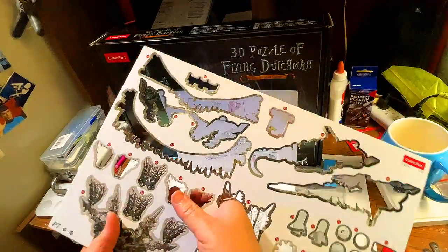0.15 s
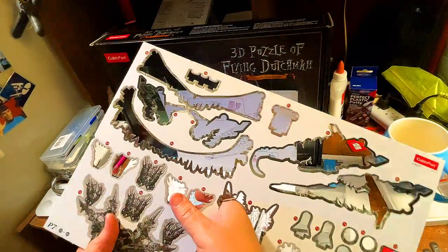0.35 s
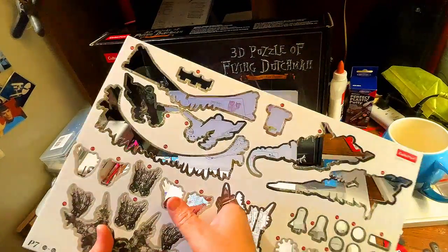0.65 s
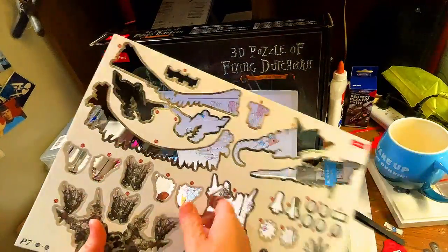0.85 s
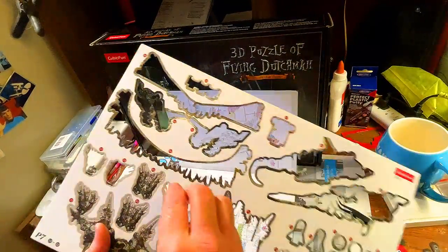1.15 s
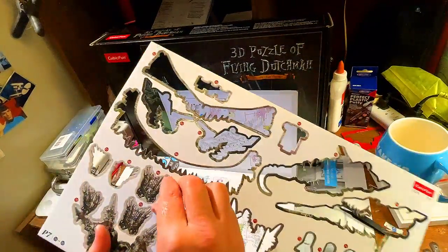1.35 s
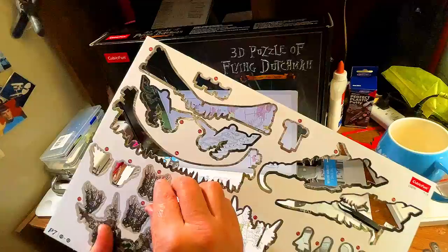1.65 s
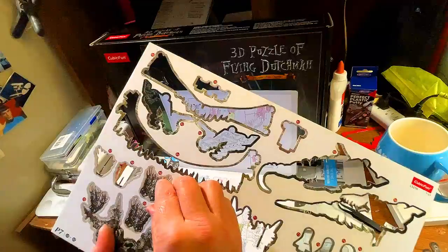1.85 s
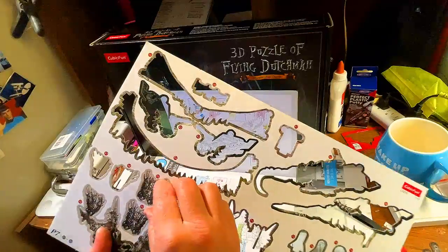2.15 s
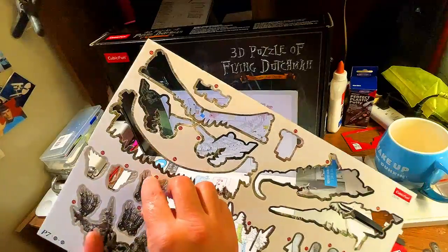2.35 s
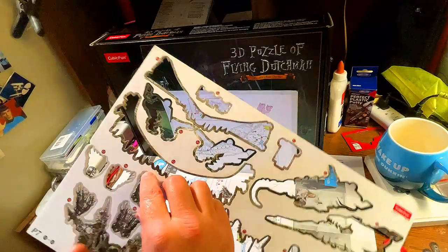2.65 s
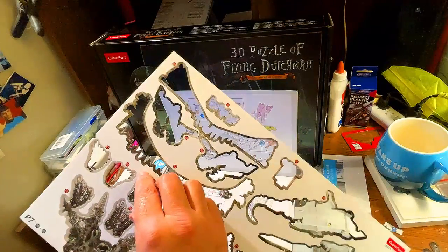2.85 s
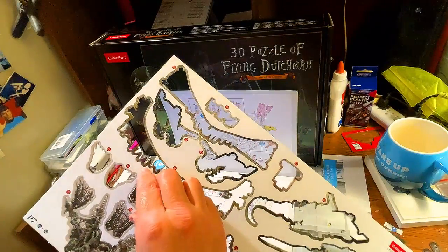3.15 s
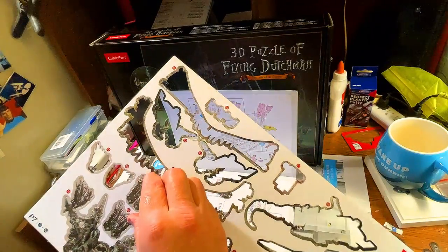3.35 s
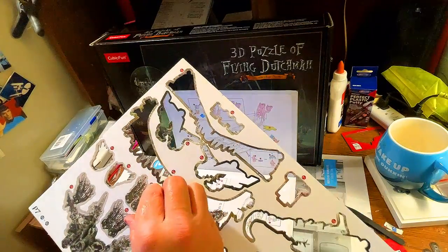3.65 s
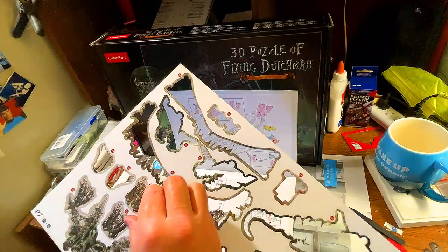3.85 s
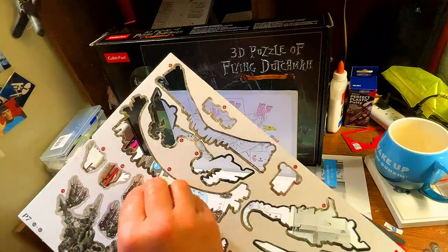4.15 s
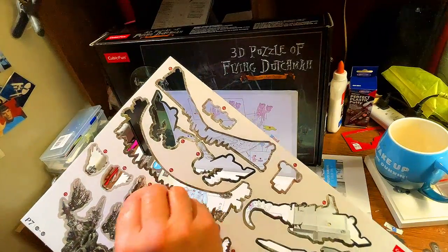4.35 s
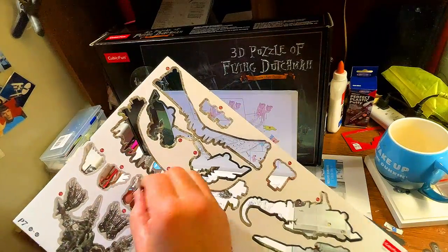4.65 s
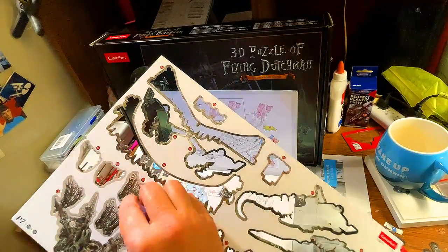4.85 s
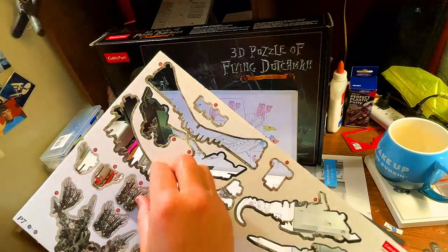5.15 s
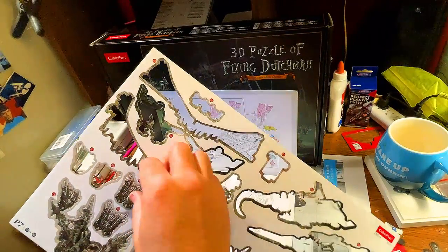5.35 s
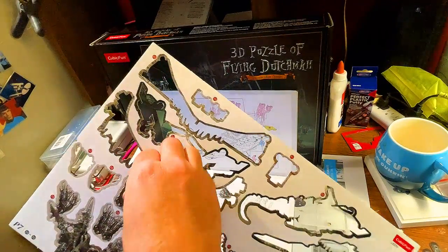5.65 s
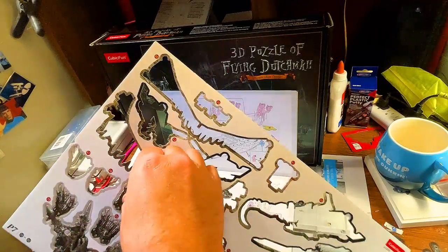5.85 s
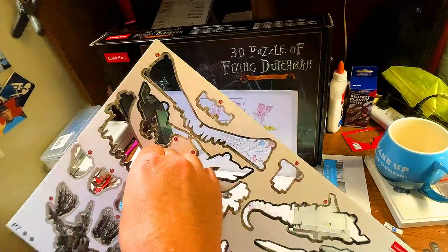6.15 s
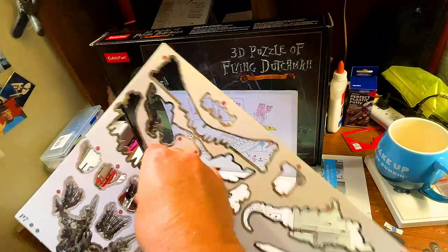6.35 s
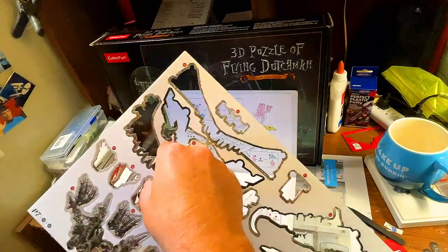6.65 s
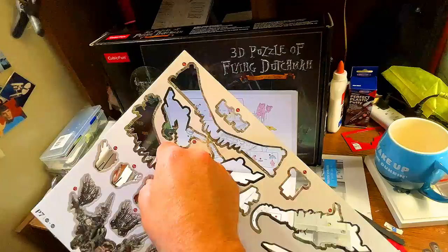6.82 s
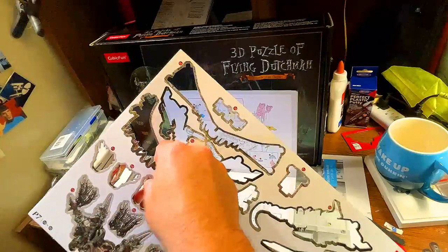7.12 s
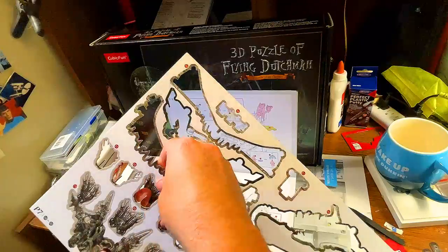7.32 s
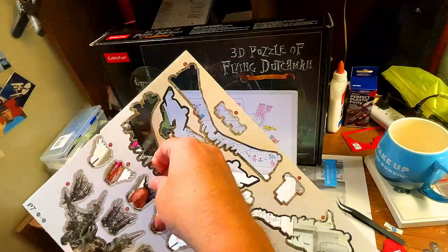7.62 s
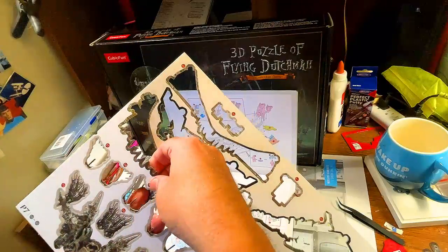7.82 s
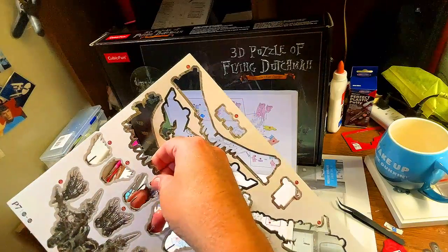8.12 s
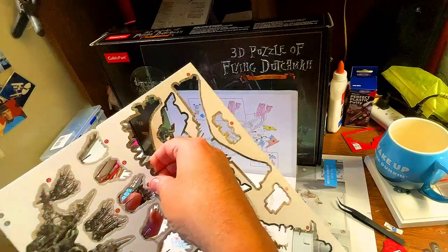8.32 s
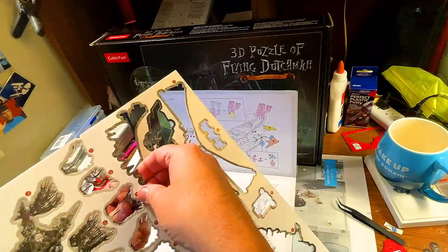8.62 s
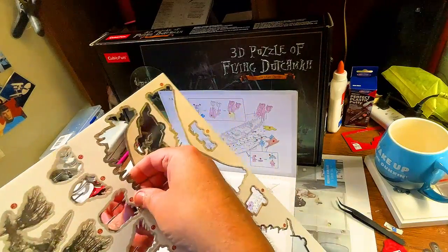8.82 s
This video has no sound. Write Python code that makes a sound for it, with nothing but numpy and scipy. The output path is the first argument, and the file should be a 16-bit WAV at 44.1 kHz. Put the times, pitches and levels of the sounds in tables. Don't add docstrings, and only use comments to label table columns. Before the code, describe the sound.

Close to a small microphone at a desk, fingers rub stiff cardboard and pop pieces from it. A few light snaps come first, then a quieter rub, then a loud cluster of cracks at two seconds. More bursts follow at uneven gaps, with soft knocks, a quiet stretch, and a final rough tear. A low appliance hum continues throughout in the small, dry room.

```python
import sys
import numpy as np
from scipy import signal
from scipy.fft import rfft, irfft
from scipy.io import wavfile
from scipy.ndimage import uniform_filter1d, minimum_filter1d

SR = 44100
rng = np.random.default_rng(int(sys.argv[2]) if len(sys.argv) > 2 else 0)


def to_wav(sig):
    pcm = np.clip(np.atleast_2d(sig), -1, 1) * 32767
    pcm = np.round(pcm).astype(np.int16)
    wavfile.write(sys.argv[1], SR, pcm.T)


def volts_from_decibels(level):
    exponent = np.asarray(level, float) / 20
    return 10 ** exponent


N = 396018


def evened(x):
    return x / np.sqrt(np.mean(x ** 2) + 1e-20)


def peaked(x):
    return x / (abs(x).max() + 1e-20)


def read(points, hz):
    f, value = np.transpose(points)
    return np.interp(np.log(hz + 1), np.log(f + 1), value)


def add(mix, s, sound):
    part = mix[max(round(s * SR), 0):][:len(sound)]
    part += sound[:len(part)]


def noise(points, size, patchy_db):
    hz = np.fft.rfftfreq(size, 1 / SR)
    a, b, patches = rng.standard_normal((N * 4 // size + 5, len(hz), 3)).T
    patches = uniform_filter1d(patches, size // 100, 0)
    patches = evened(uniform_filter1d(patches, 8, 1))
    level_db = read(points, hz)[:, None] + patchy_db * patches.clip(-2, 2)
    z = (a + 1j * b) * volts_from_decibels(level_db)
    return evened(signal.istft(z, nperseg=size, noverlap=size * 3 // 4)[1][:N])


# time in seconds, change of level in dB.
HISS_HELD_DOWN = [(0, 0), (1.3, -0.5), (1.9, -0.5), (2.1, -4), (2.9, -3.5), (3.3, -5), (3.6, 1.5),
                  (4.4, -2), (4.7, 0.5), (5.1, -2.5), (5.6, 0), (6.5, 0.5), (6.75, -1), (7.0, 1),
                  (8.0, 0.5), (8.55, -1.5), (8.98, 0.5)]


def hushed(air):
    high_pass = signal.butter(2, 650, "high", fs=SR, output="sos")
    upper = signal.sosfiltfilt(high_pass, air)
    change_db = np.interp(np.arange(N) / SR, *np.transpose(HISS_HELD_DOWN))
    return air + (volts_from_decibels(change_db) - 1) * upper


# frequency in Hz, level in dB.
HUM_TONES = [(68, -60), (102.6, -43.5), (120.7, -38), (137.2, -48.5), (154.3, -45.5), (204.8, -43.5),
             (238.4, -51.5), (306.2, -49), (622, -70), (361.6, -65.5), (410, -65), (457, -71.5)]
# frequency in Hz, density in dB per Hz.
FAN_RUSH = [(30, -51.5), (70, -21), (130, -12.5), (250, -15.5), (330, -21), (460, -33.5), (616, -36),
            (950, -44), (1200, -26), (2500, -31), (4000, -42.5), (4900, -51), (5700, -63.5), (7000, -69.5),
            (9000, -96)]


def appliance():
    t, hum = np.arange(N) / SR, 0
    for hz, db in HUM_TONES:
        drift = uniform_filter1d(rng.standard_normal(N // 100 + 1), 60)
        drift = evened(uniform_filter1d(drift, 60))
        drift = np.interp(t, np.arange(len(drift)) * 100 / SR, drift)
        phase = 2 * np.pi * (hz * t + rng.random()) + 0.4 * drift
        hum = hum + np.sqrt(2) * volts_from_decibels(db + 0.5 * drift) * np.sin(phase)
    return hum + volts_from_decibels(-41.5) * hushed(noise(FAN_RUSH, size=2048, patchy_db=1.72))


# frequency in Hz, width in Hz, height in dB.
SHEET_MODES = [(1364, 220, 4), (2024, 200, 4), (3250, 260, 5), (4300, 300, 4), (5400, 350, 4.5)]


def ringing(x):
    hz = np.fft.rfftfreq(len(x), 1 / SR)
    lift_db = sum(0.53 * db / (1 + ((hz - f) / width) ** 2) for f, width, db in SHEET_MODES)
    return irfft(rfft(x) * volts_from_decibels(lift_db), len(x))


# frequency in Hz, level in dB.
SKIN_HISS = [(4000, -18), (6000, -7.5), (8500, -7.5), (11000, -5), (13000, -7), (15800, -21)]
# frequency in Hz, level in dB.
CARD_FLEX = [(250, -39.5), (600, -7.5), (1000, -13.5), (1500, -2.5), (3000, 1), (5000, -9.5), (7000, -26),
             (9500, -59)]


def rubbed_card():
    grain = evened(uniform_filter1d(rng.standard_normal(N), 70)).clip(-2.5, 2.5)
    judder = evened(uniform_filter1d(rng.standard_normal(N), 700)).clip(-2.5, 2.5)
    catches = volts_from_decibels(2.5 * grain + 2.5 * judder)
    hiss = volts_from_decibels(-10.5) * evened(catches * noise(SKIN_HISS, size=256, patchy_db=1.8))
    flex = volts_from_decibels(-1.5) * evened(catches * ringing(noise(CARD_FLEX, size=256, patchy_db=1.8)))
    return hiss, flex, catches


# firmest moment in seconds, press in seconds,
# ease in seconds, hiss in dB, flexing of the card in dB.
FINGER_SLIDES = [(0.0, .01, 0.071, -34.5, -36), (0.116, 0.16, 0.047, -49.5, -46.5),
                 (0.29, 0.028, 0.26, -59, -51.5), (1.1, 0.12, 0.24, -43, -45.5),
                 (1.6, 0.15, 0.074, -44.5, -42), (2.1, .01, 0.08, -38, -46.5), (2.4, .01, 0.58, -64.5, -69),
                 (3.645, 0.093, 0.015, -45, -49), (4.52, 0.029, 0.16, -51, -48.5),
                 (4.8, 0.069, 0.22, -39.5, -43), (5.962, 0.068, 0.18, -55, -43.5),
                 (6.194, 0.051, 0.12, -40, -39), (6.35, .01, 0.19, -64, -50),
                 (6.48, 0.0052, 0.059, -42, -47), (7.06, .03, 0.33, -63, -48),
                 (7.47, 0.1, 0.098, -41.5, -44), (7.952, 0.042, 0.19, -43, -44.5),
                 (8.15, 0.13, 0.33, -46, -47), (8.4, 0.31, 0.13, -48.5, -51),
                 (8.745, 0.048, 0.014, -48, -45), (8.975, 0.042, .05, -24.5, -38.5),
                 (8.92, 0.0035, .3, -38, -29), (1.2, .12, 0.054, -47.5, -53),
                 (6.06, 0.095, 0.048, -56, -44)]
# firmest moment in seconds, hiss in dB, flexing in dB.
FINGERTIP_BRUSHES = [(0.6, -62.5, -67), (0.722, -41.5, -64), (1.4, -55, -41.5), (1.895, -56.5, -49),
                     (2.5, -49, -60), (3.7, -61, -51), (2.962, -57, -60), (1.1, -63, -65), (7.37, -62, -53),
                     (0.44, -53.5, -60), (3.002, -35, -35), (3.54, -57.5, -50.5), (4.868, -37, -38.5),
                     (5.207, -46, -52.5), (5.471, -53, -57), (5.736, -66.5, -53), (10, -43.5, -47),
                     (8.624, -42.5, -66), (8.595, -67, -59), (6.25, -47.5, -44), (1.47, -55.5, -45),
                     (1.75, -69, -58), (4.35, -45, -53), (4.74, -58, -54), (2.5, -55.5, -52.5),
                     (5.6, -73, -56), (7.88, -61, -49), (7.26, -58.5, -52), (7.06, -60, -54),
                     (1.612, -43.5, -50), (7.315, -64, -52)]
# firmest moment in seconds, flexing in dB.
NAIL_SCUFFS = [
    (7.022, -43.5),
    (8.7, -46),
    (4.17, -41.5),
    (5.41, -59.5),
    (2.2, -62),
    (7.1, -47),
]


def strokes(hiss, flex):
    rows = [tuple(row) for row in FINGER_SLIDES]
    rows += [(s, 0.025, 0.021, hiss_db, flex_db) for s, hiss_db, flex_db in FINGERTIP_BRUSHES]
    rows += [(s, 0.0047, 0.051, db - 29, db) for s, db in NAIL_SCUFFS]
    s, press, ease, hiss_db, flex_db = np.transpose(rows)[:, :, None]
    t = np.arange(N) / SR
    slow = t[::40]
    away = np.where(slow < s, (s - slow) / abs(press), (slow - s) / abs(ease))
    lost_db = 30 * away ** 1.66
    hiss_gain = volts_from_decibels((hiss_db - lost_db).max(0))
    flex_gain = volts_from_decibels((flex_db - 0.55 * lost_db).max(0))
    return np.interp(t, slow, hiss_gain) * hiss + np.interp(t, slow, flex_gain) * flex


# start in seconds,
# end in seconds, hiss in dB, song in dB, song frequency in Hz.
EDGE_DRAGS = [(5.934, 6.1, -58, -62, 3600), (6.172, 6.267, -42, -45.5, 3340), (8.69, 8.748, -72, -44, 3200),
              (8.755, 8.79, -32, -29.5, 3456), (8.918, 8.95, -43, -28, 2500),
              (8.927, 9.0, -37, -32.5, 5400), (2.73, 2.773, -45.5, -56, 4000),
              (4.784, 4.82, -46, -50, 3560), (4.838, 4.88, -53, -43.5, 3670),
              (1.06, 1.24, -54.5, -58, 3430), (7.41, 7.53, -60, -61, 3400),
              (1.51, 1.67, -54.5, -58.5, 3200), (8.79, 8.845, -50, -50, 3200),
              (0.0, 0.126, -55, -52.5, 5600), (0.295, 0.405, -62, -62.5, 4200),
              (1.391, 1.412, -52, -60, 3000), (1.445, 1.5, -56.5, -59.5, 2000),
              (1.872, 1.909, -58.5, -60, 4000), (3.056, 3.079, -30, -25, 5460),
              (3.083, 3.137, -36, -38, 4280), (5.6, 5.93, -80, -70.5, 5560), (8.198, 8.45, -60, -55, 7000),
              (8.335, 8.364, -44, -61, 3200)]


def drags(hiss, catches):
    out = np.zeros(N)
    width_hz, edge_s = 290, 0.0092
    r = np.exp(-np.pi * width_hz / SR)
    rub = catches * rng.standard_normal(N)
    for start, end, hiss_db, song_db, hz in EDGE_DRAGS:
        at = slice(round(start * SR), min(round(end * SR), N))
        t = np.arange(at.start, at.stop) / SR
        resonance = [1, 0, -1, 1, -2 * r * np.cos(2 * np.pi * hz / SR), r * r]
        song = signal.sosfilt([resonance] * 2, rub[at])
        held = (np.minimum(t - start, end - t) / edge_s).clip(0, 1) ** 2
        out[at] += held * (volts_from_decibels(hiss_db) * hiss[at] + volts_from_decibels(song_db) * evened(song))
    return out


# start in seconds, peak in dB,
# frequency in Hz.
DESK_KNOCKS = [(2.611, -22, 323), (3.064, -26, 660), (3.502, -30.5, 67), (4.172, -26.6, 151.8),
               (4.191, -20.5, 324.6), (4.199, -25, 154.7), (4.501, -31.5, 640), (4.631, -18.5, 174),
               (4.634, -31.5, 424), (2.911, -30, 1600), (4.911, -28.5, 369), (4.916, -24.5, 650),
               (6.5855, -16.5, 633), (6.586, -25, 835), (6.586, -19.5, 1050), (6.589, -23.5, 166),
               (7.025, -28.5, 674), (8.761, -31.5, 397), (8.951, -28.5, 506), (0.12, -36, 66.4),
               (0.55, -35, 62), (0.8, -38, 68), (1.17, -36, 65.4), (2.3, -40, 66), (2.95, -38.5, 63.9),
               (4.05, -40.5, 65.8), (4.62, -38, 62), (3.65, -42, 66), (4.33, -39, 350), (4.55, -38, 700)]


def knocks():
    out, t = np.zeros(N), np.arange(6000) / SR
    for s, db, hz in DESK_KNOCKS:
        cycles = hz * t
        onset = 1 - np.exp(-cycles / 0.5)
        add(out, s, volts_from_decibels(db - 60 * cycles / 14) * np.sin(2 * np.pi * cycles) * onset)
    return out


def causal(gain_db):
    fold = irfft(gain_db * np.log(10) / 20)
    fold[1:len(fold) // 2] *= 2
    fold[len(fold) // 2 + 1:] = 0
    return np.exp(rfft(fold))


def snap(high_db, low_db, middle_db, ring_hz, length, rise_s):
    chance = rng.standard_normal((2000, 2))
    t = np.arange(len(chance)) / SR
    fade = np.exp(-(t / (0.0066 * np.clip(length, .15, 3))) ** 1.29)
    fibres = 1.03 * peaked(chance[:, 0] * volts_from_decibels(7.3 * np.abs(chance[:, 1])) * fade)
    fibres[1] = 1
    fibres *= np.minimum(t / rise_s, 1)
    z, hz = rfft(fibres, 4096), np.fft.rfftfreq(4096, 1 / SR)
    white_db = -10 * np.log10(uniform_filter1d(abs(z) ** 2, size=45))
    low, middle, high = low_db + 22, middle_db + 19.5, high_db + 12
    card_db = read([(150, low - 36), (400, low - 14), (850, low - 12), (1300, low), (2100, low),
                    (2900, middle), (4000, middle - 3), (6500, (middle + high) / 2 - 4),
                    (9000, high), (13000, high - 3), (16000, high - 12)], hz)
    ring_db = 5.7 / (1 + ((hz - ring_hz) / 330) ** 2)
    for (mode_hz, width, db), (share, shift) in zip(SHEET_MODES, chance):
        off = (hz - mode_hz * (1 + 0.057 * shift)) / width
        ring_db = ring_db + db * min(abs(share), 1.5) / (1 + off ** 2)
    return irfft(z * causal(white_db + card_db + ring_db))[:len(chance)]


def snaps(rows, length, rise_s=.00002):
    out = np.zeros(N)
    for s, db, bright_db, weight_db, ring_hz in rows:
        add(out, s, snap(db + bright_db, db + weight_db, db, ring_hz, length, rise_s))
    return out


# start in seconds, force in dB, brightness in dB,
# weight in dB, ring of the card in Hz.
CLEAN_BREAKS = [(0.2095, -18, -13.5, 1.5, 3000), (0.4582, -29.5, 13, -5.5, 2070),
                (0.543, -15.5, 10, -10, 2480), (0.7593, -30, 12, -10, 4270), (1.9198, -5, -2.5, -9.5, 2820),
                (1.9773, -8, 9, -4.5, 3450), (2.0138, -22, 9, -14.5, 3820), (2.03, -6.5, 11, -5.5, 3434),
                (2.3242, -13.5, 4, -14, 3970), (2.5966, -12, 2, -18, 3320), (2.6114, -2.5, -2.5, -10, 3800),
                (2.625, -1.5, 5, -11, 3910), (3.6552, -17, 15, 2.5, 2970), (3.66, -7.5, 2, -9, 2830),
                (3.718, -17.5, 10, -9.5, 4200), (3.8125, -18, 5, -2, 2670), (3.8687, -10, 6.5, -9, 3540),
                (3.928, -10.5, 7, -3, 3300), (4.196, -7, 6.5, -1.5, 3050), (4.9167, -6, -2.5, -9, 3540),
                (4.9431, -18.5, 9, -1, 2760), (6.5842, -4.5, 1, -2, 2016), (8.23, -20.5, 8.5, -2.5, 2060),
                (8.755, -21, 9, -0.5, 3320)]


def cracks():
    return snaps(CLEAN_BREAKS, length=0.74)


# start in seconds, force in dB,
# brightness in dB, ring in Hz.
SHEET_BUCKLES = [(0.2948, -26, -40, 2780), (0.3777, -38, -26, 2210), (0.634, -34, -6.5, 1508),
                 (1.263, -27.5, -34.5, 3445), (1.3766, -35.5, -37, 1335), (1.393, -41, -12, 1294),
                 (1.451, -31, -21.5, 1540), (2.439, -35, -3, 2190), (2.7167, -29.5, -3, 2400),
                 (2.9102, -30, -55, 1500), (4.169, -35, -4, 1346), (4.4952, -31, -17, 2207),
                 (4.8505, -30.5, -16.5, 3480), (5.414, -34, -54.5, 3300), (5.469, -46.5, 3, 1367),
                 (6.4832, -25, -5, 3250), (7.0236, -26.5, -26, 1725), (7.1167, -33, -4, 2770),
                 (7.5604, -24.5, -33.5, 3710), (7.6325, -28, -35.5, 2900), (8.043, -31, -6.5, 2090),
                 (8.271, -36, -5, 1981), (8.4654, -34.5, -10, 2293), (8.6918, -26.5, -34, 3100),
                 (8.7387, -22, -27, 3200), (8.9194, -19.5, -16, 2510)]


def creaks():
    rows = [(s, db, bright_db, 0.5 - 4 * (hz - 2320) / 1000, hz) for s, db, bright_db, hz in SHEET_BUCKLES]
    return snaps(rows, length=1.2, rise_s=.002)


# start in seconds, force in dB, brightness in dB, ring in Hz.
EDGE_CATCHES = [(0.432, -46, 6, 2540), (0.503, -48, 16, 1100), (0.53, -42, 17, 1190),
                (0.5389, -36, 0, 3420), (0.5774, -32, 1.5, 2610), (0.5896, -52, 15, 2196),
                (1.9038, -39, 8.5, 2596), (1.9143, -43, 21, 2928), (2.2631, -37, 13.5, 1260),
                (2.7286, -32.5, 5, 4370), (2.9927, -24, -10, 3260), (3.0185, -43, 6, 2002),
                (3.7499, -36, 11.5, 1370), (3.7692, -32, 1.5, 2460), (3.7827, -35, 6.5, 2422),
                (3.8303, -36, 13, 1280), (3.8954, -35, 13.5, 3350), (4.296, -33, 3, 1202),
                (4.8036, -24.5, -4, 1379), (6.1812, -33, -4, 3280), (6.3375, -25, -2, 3100),
                (8.0992, -23, -0.5, 2320), (8.209, -28, 0, 3348), (8.2182, -21, -1.2, 3200),
                (8.2425, -24, -3, 3240), (8.3366, -34, 14, 3240), (8.3605, -30, 6, 2130),
                (8.4147, -35, -4, 2304), (8.7216, -50, 13, 3120), (8.963, -29, -7, 5400)]


def ticks():
    rows = [(s, db, bright_db, -5, hz) for s, db, bright_db, hz in EDGE_CATCHES]
    return snaps(rows, length=0.89, rise_s=.002)


# start in seconds, force in dB,
# brightness in dB, ring in Hz.
FIBRE_CLICKS = [(1.9218, -10.5, 6, 2600), (1.9858, -20, 5, 4700), (2.0158, -11.5, 9.5, 3800),
                (3.6525, -27.5, 9.5, 3000), (3.7192, -15.5, 10.5, 5700), (4.1905, -12.5, 9.5, 3800),
                (4.193, -15.5, 8, 3100), (4.2005, -14.5, 5.5, 3300), (6.3051, -51, 12, 3000),
                (6.3984, -51.5, 11, 3000), (8.1681, -46, 8, 4500), (8.2973, -48, 12, 3000),
                (8.401, -50, 8, 3000), (8.5932, -61, 16, 3000), (8.6999, -46.5, 12, 3200),
                (2.4926, -56, 11.5, 3000), (2.8323, -56.5, 9, 3000), (7.0519, -56, 8, 4000),
                (7.0978, -49, 10, 4500), (7.2185, -54, -2, 5000), (5.9464, -41, 11, 2900),
                (5.9645, -40, 8, 4300), (6.0537, -45, 4, 5200), (4.178, -47, 10.5, 3000),
                (3.857, -42, 12, 3000), (8.092, -48, 8, 4500), (8.4525, -40, 3, 4000),
                (8.645, -57, 11, 3000), (6.568, -64.5, 9, 3000), (6.94, -72.5, 14, 3000),
                (8.7375, -47.5, 18, 3200), (1.5, -51.5, 14, 3000), (3.67, -22, 6, 4500),
                (6.627, -36, 2.5, 4000), (2.6295, -13.5, 4.5, 3900), (8.4, -37, -32, 3200),
                (8.5, -39, -34, 3100), (3.9284, -12, 8, 2800), (0.5432, -19, 11, 4400)]


def clicks():
    faint_db = -38
    sharp = [(s, db, bright_db, -7, hz) for s, db, bright_db, hz in FIBRE_CLICKS if db > faint_db]
    faint = [(s, db, bright_db, -6.5, hz) for s, db, bright_db, hz in FIBRE_CLICKS if db <= faint_db]
    return snaps(sharp, length=.35) + snaps(faint, length=.8, rise_s=.003)


# start in seconds, force in dB, brightness in dB,
# weight in dB, ring of the card in Hz.
FIBRE_TEARS = [(1.924, -7, -4, -12, 2800), (1.9377, -5, 6, -9.5, 2980), (1.972, -26, 12.5, 5, 3950),
               (1.9744, -9, 5.5, -13.5, 3890), (2.0536, -19.5, 7.5, -2, 2660),
               (2.1436, -25, 5.5, -22, 4640), (2.307, -10.5, 5, -12.5, 3300), (2.627, -22, 12, -19, 3340),
               (3.0602, -15.5, 8.5, 0, 3700), (3.067, -7.5, -2, -9, 2000), (3.0941, -20.5, 3, 2, 2780),
               (3.103, -13.5, 0.5, -9, 3300), (3.1247, -15, 0.7, -27.5, 3560), (3.7084, -24, 16, -12, 2680),
               (3.7575, -24, 14, -7, 3165), (4.1895, -8.5, 4.5, -7, 3240), (4.882, -17.5, 3.5, -6, 2088),
               (4.8966, -21, 6, -6.5, 3919), (4.908, -4, -8, -14.5, 4430), (8.7607, -11.5, 11, -2, 3240),
               (8.7691, -5.5, -10, -21, 3200), (8.7752, -6.5, 1.5, -13, 3250), (8.783, -21, 6, 2, 3250),
               (8.939, -17, -6, -16, 3700)]


def tears():
    return snaps(FIBRE_TEARS, length=1.3)


def hands():
    hiss, flex, catches = rubbed_card()
    rubbing = strokes(hiss, flex) + drags(hiss, catches)
    breaking = cracks() + creaks() + ticks() + clicks() + tears()
    return rubbing + knocks() + breaking


# frequency in Hz, time to fall 60 dB in seconds.
ROOM_DECAY = [(1500, 0.22), (6000, 0.23), (12000, 0.22)]


def room(x):
    hz, t, z = signal.stft(rng.standard_normal((3, SR // 2)), SR, nperseg=256)
    z = z * volts_from_decibels(-60 * t / read(ROOM_DECAY, hz)[:, None])
    tails = signal.istft(z, SR, nperseg=256)[1]
    tails[:, :round(.006 * SR)] = 0
    turn = 2 * np.pi * (np.arange(N) / SR * 17 + np.arange(3)[:, None] / 3)
    shares = np.sqrt(2 / 3) * np.cos(turn)
    tails = tails / np.linalg.norm(tails[0])
    return signal.fftconvolve(x * abs(shares), tails, axes=1)[:, :N].sum(0)


def scene():
    near = hands()
    desk = volts_from_decibels(-15.0) * np.r_[np.zeros(round(.0043 * SR)), near][:N]
    return (near + desk + volts_from_decibels(-13.5) * room(near) + appliance())[None]


# frequency in Hz, width in Hz, height in dB.
MICROPHONE_PORT = (11020, 1140, 13.5)


def microphone(x):
    hz, width, db = MICROPHONE_PORT
    r = np.exp(-np.pi * width / SR)
    port = signal.lfilter([1 - r, 0, r - 1], [1, -2 * r * np.cos(2 * np.pi * hz / SR), r * r], x)
    return x + (volts_from_decibels(db) - 1) * port


def gain_control(x):
    pole = 1 / (.12 * SR)
    power = signal.lfilter([pole], [1, pole - 1], x[0] ** 2)
    power_db = 10 * np.log10(abs(power) + 1e-12)
    fall = np.arange(N) * 6.16 / SR
    held_db = np.maximum.accumulate(power_db + fall) - fall
    over_db = np.maximum(held_db + 21, 0)
    return x / volts_from_decibels(1.3 * uniform_filter1d(over_db, 2000, origin=999))


def gate(x, floor_db, depth_db, span_db):
    hz, t, z = signal.stft(x, SR, nperseg=512, noverlap=384)
    power = uniform_filter1d(abs(z) ** 2, size=17, axis=1)
    power = uniform_filter1d(power, size=5, axis=2)
    level_db = 10 * np.log10(power.clip(1e-16))
    recent_db = -minimum_filter1d(-level_db, size=81, axis=2, origin=40)
    under_db = np.maximum(floor_db, recent_db - span_db) - level_db
    treble = np.clip((hz[:, None] - 4500) / 3000, 0, 1)
    shut = np.clip(under_db / 19.0, 0, 1) * treble
    z *= volts_from_decibels(-depth_db * shut) * (hz[:, None] < 15900)
    return signal.istft(z, SR, nperseg=512, noverlap=384)[1][:, :N]


def band_limit(x):
    return signal.sosfilt(signal.butter(12, 16470, fs=SR, output="sos"), x)


def record(dry):
    x = gain_control(microphone(dry))
    x = gate(x, floor_db=-73.5, depth_db=9.5, span_db=69.0)
    mix = np.clip(x, -.9, .9)
    return band_limit(mix)


dry = scene()
out = record(dry)
to_wav(out)
```